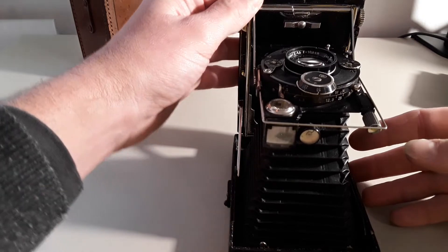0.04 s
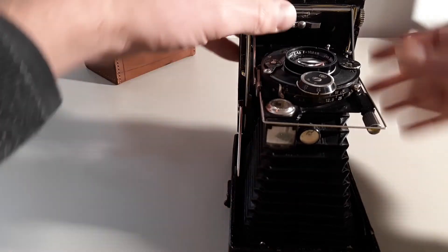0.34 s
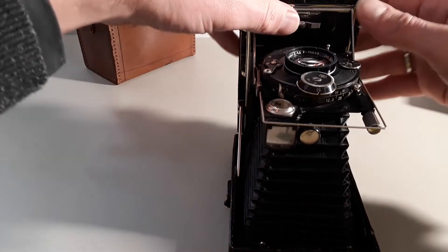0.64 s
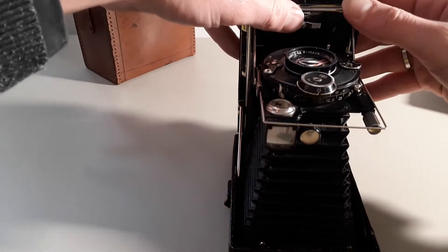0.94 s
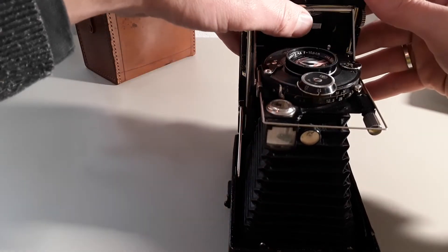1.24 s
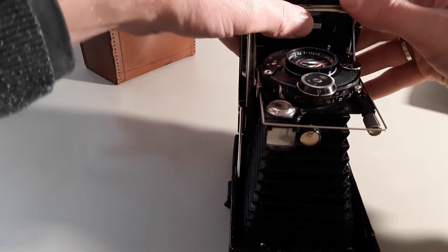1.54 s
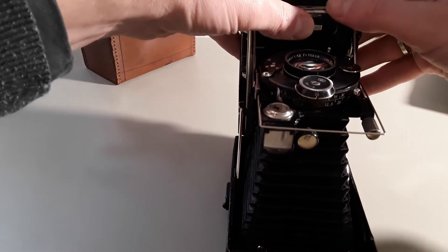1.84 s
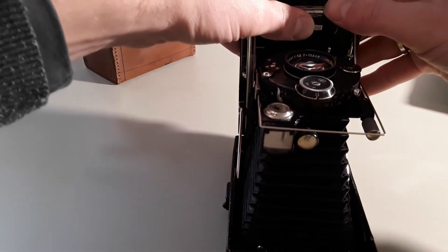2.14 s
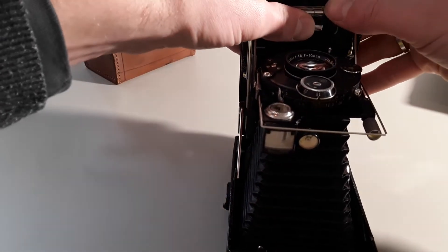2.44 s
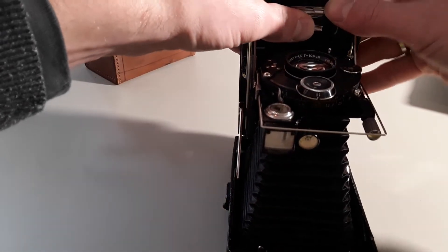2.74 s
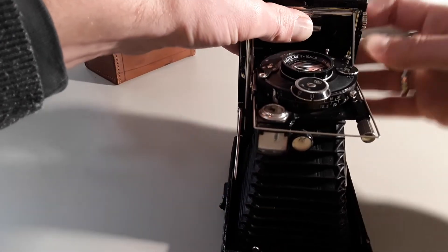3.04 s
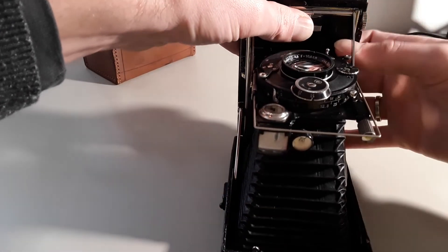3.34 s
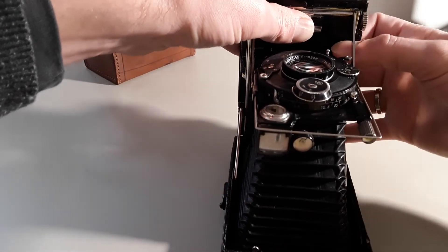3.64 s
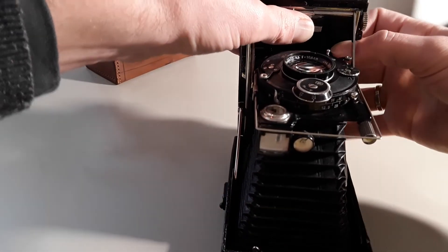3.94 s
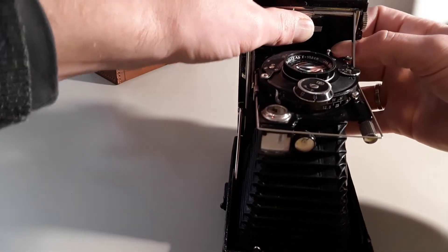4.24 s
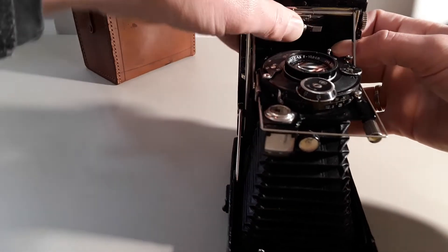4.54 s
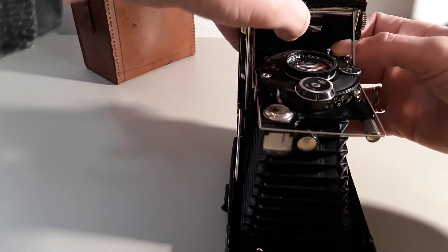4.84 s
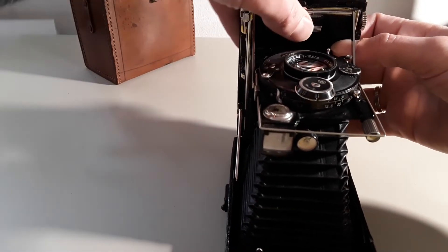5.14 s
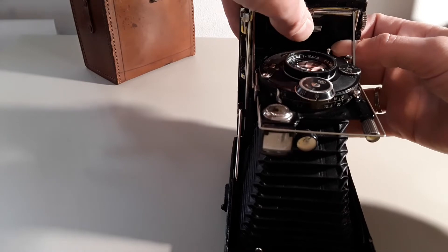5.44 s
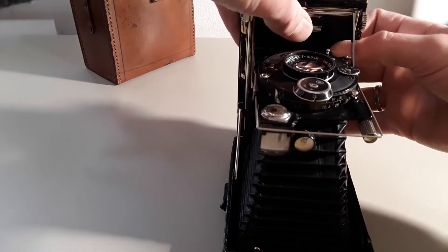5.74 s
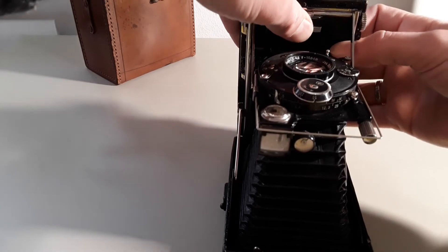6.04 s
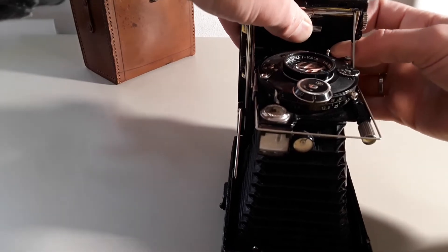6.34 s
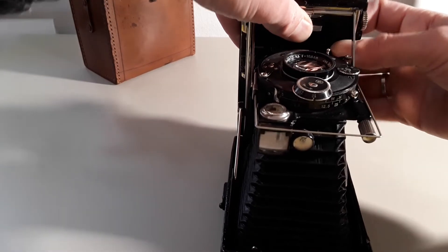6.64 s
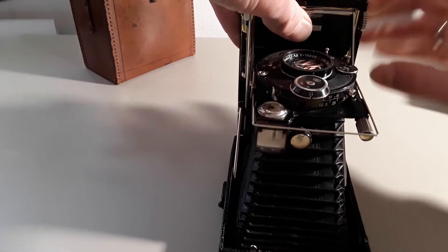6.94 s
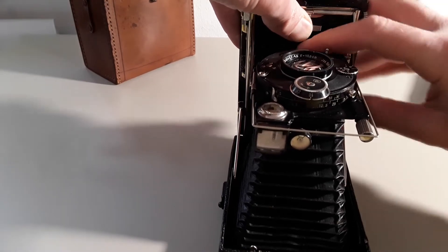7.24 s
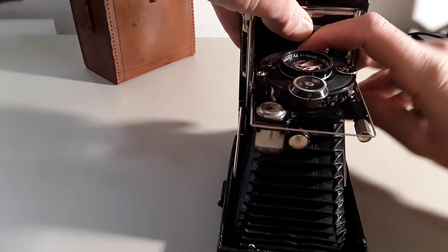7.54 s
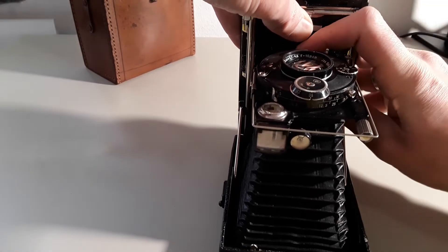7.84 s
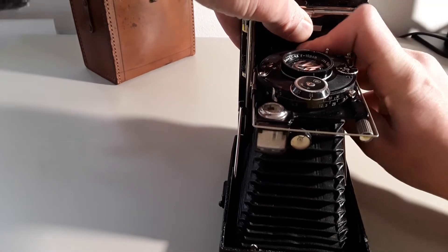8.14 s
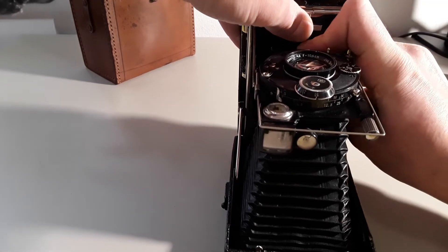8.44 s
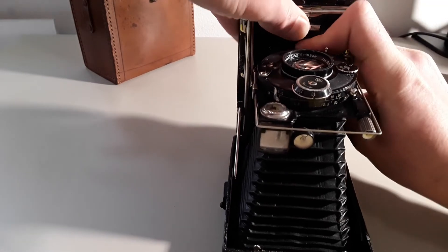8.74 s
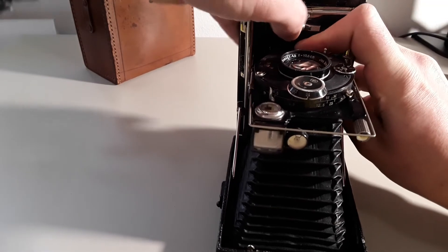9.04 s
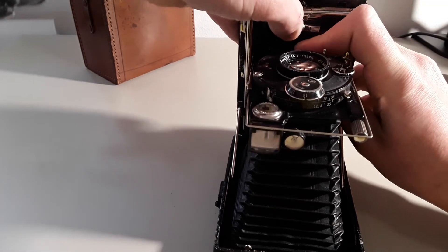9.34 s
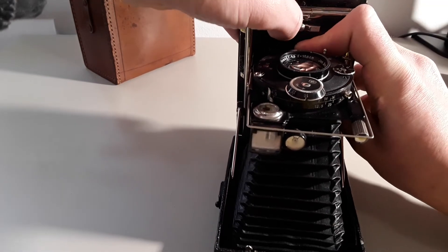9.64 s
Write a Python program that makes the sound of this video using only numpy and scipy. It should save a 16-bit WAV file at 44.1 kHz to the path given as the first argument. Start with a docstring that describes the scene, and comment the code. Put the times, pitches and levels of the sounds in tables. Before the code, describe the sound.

An old folding camera is handled on a table, heard close by in a quiet room with a faint low background noise. Fingers rub and shuffle softly over leather and metal throughout. From about 1 second, the hollow body gives light knocks, bunching around 2 seconds. Near 3 seconds a steel strut scrapes with a tiny squeak, followed by small ticks. More knocks and a sharp catch click come between 4 and 4.7 seconds, then a brief metal clink just after 5. Firmer knocks arrive around 6 seconds. From 6.7 to 7.5 seconds the handling is busiest, with bumps, short scrapes, snapping levers, faint squeaks and little steel rings. After a short lull, a knock at 8.3 seconds leads to a small squeak, a click and the loudest knock near 8.8. Another solid knock lands at about 9.6 seconds.

```python
"""Soft shuffling, hollow knocks, small ticks, scrapes and squeaks sound close by in a quiet room.
Two hands are working the struts (metal arms) of an old folding camera that stands on a table.
Fingers drag over its leather, and its hollow body knocks and rocks on the table top. Steel struts
stick and slip in their slides, catches and levers snap, and loose steel parts ring briefly."""
import sys
import numpy as np
from scipy import signal
from scipy.fft import rfft, irfft
from scipy.io import wavfile

SR = 44100
rng = np.random.default_rng(int(sys.argv[2]) if len(sys.argv) > 2 else 0)


def wav_record(signal):
    """Record a signal, one row per channel, as 16-bit PCM in the file named by sys.argv[1]."""
    frames = np.transpose(np.atleast_2d(signal))
    bounded = np.clip(frames, -1, 1)
    # unit amplitude maps onto the largest positive 16-bit level
    quanta = np.round(bounded * 32767).astype(np.int16)
    wavfile.write(sys.argv[1], SR, quanta)


N = 426888
TAPS = 8192  # samples in one short ring

# the tones at which the steel struts and lens board ring: (pitch [Hz], width [Hz], level [dB])
STEEL_TONES = [(1520, 890, 10.5), (1920, 370, -17), (2500, 390, 3), (3125, 340, 0), (3526, 260, -1.5),
               (4190, 310, -10), (5040, 480, -7), (6100, 680, -11.5), (7580, 1340, -1), (8460, 770, -8),
               (9170, 1200, -15.5), (13240, 1600, -17.5)]


def undb(db):
    """Turn decibels into a number to multiply by."""
    return 10 ** (np.asarray(db) / 20)


def unit(x):
    """Scale a sound to an average (rms) size of 1."""
    return x / np.sqrt(np.mean(x ** 2) + 1e-20)


def add(out, s, x):
    """Mix x into out, starting at s seconds."""
    i = max(int(s * SR), 0)
    out[i:i + len(x)] += x[:max(N - i, 0)]


def cut(x, hz, kind, order):
    """Keep the "low" part, the "high" part or one "band" of a sound."""
    return signal.sosfilt(signal.butter(order, np.clip(hz, 10, .45 * SR), kind, fs=SR, output="sos"), x)


def wobble(count, hz):
    """A random curve that wanders up and down, mostly slower than hz."""
    return unit(cut(rng.standard_normal(count), hz, "low", order=2))


def response(tones):
    """How an object rings after one tap: wider tones die sooner, and little sounds below the lowest."""
    t = np.arange(TAPS) / SR
    ring = sum(undb(db) * width * np.exp(-np.pi * width * t) * np.sin(2 * np.pi * hz * t)
               for hz, width, db in tones)
    return cut(ring, .75 * tones[0][0], "high", order=3)


def slips(count, per_s, spread_db):
    """Surfaces stick and slip, making tiny jolts of uneven size at random moments."""
    hit = rng.random(count) < per_s / SR
    direction = rng.choice([-1, 1], count)
    return hit * direction * undb(spread_db * np.minimum(rng.exponential(size=count), 4))


def contact(x, hard_db, hard_hz=800, db_per_octave=5, soft_hz=245, roll_off=1.67, width_hz=160):
    """The body bounces like a weight on a spring: a harder contact rings its higher tones."""
    hz = min(soft_hz + hard_hz * 2 ** (hard_db / db_per_octave), 560)
    bounce = signal.lfilter(*signal.iirpeak(hz, hz / width_hz, fs=SR), x)
    return cut(bounce, roll_off * hz, "low", order=3)


def steel(jolts, colour_db=3, dull_hz=11500, split_hz=6000):
    """Jolts shake one spot on the steel, giving a bright top and a lower ring. No two spots are alike."""
    spot = response([(hz, width, db + colour_db * rng.standard_normal()) for hz, width, db in STEEL_TONES])
    damped = cut(spot, dull_hz, "low", order=2)  # fingers muffle the highest tones
    sound = signal.fftconvolve(jolts, damped)
    return cut(sound, split_hz, "high", order=3), cut(sound, split_hz, "low", order=4)


def hands(s):
    """How strongly the hands press and slide at the times s, in dB."""
    # how hard the hands press: (time [s], level [dB])
    pressing = [(0.0, -75), (0.89, -64), (1.53, -67), (1.97, -50), (2.64, -73), (2.86, -54), (3.74, -72.5),
                (4.42, -50.5), (5.2, -66.5), (5.8, -61.5), (6.04, -53.5), (6.36, -64), (6.66, -52),
                (6.87, -49.5), (7.98, -62.5), (8.9, -52), (9.46, -64), (9.68, -73.5)]
    # how briskly the fingers slide: (time [s], level [dB])
    sliding = [(0.0, -90), (0.4, -82.5), (1.4, -89), (2.02, -81), (2.8, -96.5), (2.94, -77.5), (3.59, -92),
               (4.12, -94), (4.37, -75), (4.88, -89), (5.66, -87.5), (6.69, -79.5), (6.95, -73),
               (7.33, -72), (7.9, -87), (8.19, -85.5), (8.36, -76.5), (8.82, -72.5), (9.41, -88.5),
               (9.68, -94)]
    return [np.interp(s, *np.transpose(curve)) for curve in (pressing, sliding)]


def fidgets(per_s, scatter_db=4):
    """Small random touches of uneven strength: (time [s], pressing [dB], sliding [dB])."""
    when, size = rng.random((int(per_s * N / SR), 2)).T
    s = when * N / SR
    return zip(s, *(db + scatter_db * (2 * size - 1) for db in hands(s)))


def air(level_db=-68):
    """The quiet room makes a faint, steady noise."""
    # how that noise is spread from low to high: (pitch [Hz], relative level [dB])
    spectrum = [(25, -10.5), (60, -3), (100, 4), (300, -9.5), (500, -15), (1000, -23), (2500, -33),
                (6000, -39), (9000, -43.5), (15500, -39)]
    hz, db = np.transpose(spectrum)
    all_hz = np.arange(N // 2 + 1) * SR / N + 1
    shape = undb(np.interp(np.log(all_hz), np.log(hz), db))
    return undb(level_db) * unit(irfft(rfft(rng.standard_normal(N)) * shape, N))


def fingers(body, rumble_db=-6, hiss_db=-5, skin_hz=300, grab_hz=12, grab_db=3):
    """Skin grabs and drags on leather and metal: a dull, uneven rumble under a faint scratchy hiss."""
    press_db, slide_db = hands(np.arange(N) / SR) + grab_db * wobble(N, grab_hz)
    on_leather = signal.fftconvolve(slips(N, per_s=450, spread_db=2), body)[:N]
    on_steel = signal.fftconvolve(slips(N, per_s=3000, spread_db=3), response(STEEL_TONES))[:N]
    rumble = unit(cut(on_leather, skin_hz, "low", order=3))
    hiss = unit(cut(on_steel, 2500, "high", order=1))
    return rumble * undb(press_db + rumble_db) + hiss * undb(slide_db + hiss_db)


def nudges(body, above_press_db=9.5):
    """The fingers bump the body softly, louder as they press harder."""
    out, bump = np.zeros(N), contact(body, hard_db=-28.5)
    for s, press_db, _ in fidgets(per_s=8):
        add(out, s, undb(press_db + above_press_db) * bump / np.abs(bump).max())
    return out


def tick(top_db, low_db, chatter_s=0.0021):
    """A small steel part lets go and chatters for a few thousandths of a second."""
    t = np.arange(512) / SR
    chatter = rng.standard_normal(len(t)) * np.exp(-t / chatter_s)
    top, low = steel(chatter)
    return undb(top_db) * top / np.abs(top).max() + undb(low_db) * low / np.abs(low).max()


def rattles(above_slide_db=4.5):
    """Loose parts tick faintly as the fingers slide over them."""
    out = np.zeros(N)
    for s, _, slide_db in fidgets(per_s=6.5):
        add(out, s, tick(slide_db + above_slide_db, slide_db + above_slide_db))
    return out


def knocks(body, gain_db=-0.5, hard_bias_db=12, give_s=0.0018, rock_s=.0112, rebound=0.23,
           shudder_db=-24, shudder_s=0.011):
    """A knock rings the body once the leather gives way; it shudders, then rocks back more weakly."""
    # the body hits the table: (time [s], level [dB], clack of the higher tones [dB])
    blows = [(0.891, -37.5, -74), (1.279, -53.5, -86.5), (1.55, -41, -77), (1.7, -45, -80),
             (1.891, -35, -62), (2.031, -35.5, -66.5), (2.105, -36.5, -64.5), (2.185, -39, -68),
             (2.317, -46.5, -86), (2.659, -46, -85), (2.754, -35.5, -73), (2.894, -33, -51),
             (3.926, -50.5, -93), (4.116, -31.5, -69), (4.239, -35, -61.5), (4.352, -27.5, -49),
             (4.479, -36.5, -59), (4.604, -36, -65.5), (4.704, -41.5, -69.5), (5.561, -42.5, -70.5),
             (5.741, -45, -70), (5.816, -36.5, -73), (5.889, -30, -63.5), (5.905, -35, -63.5),
             (6.051, -24, -52), (6.132, -27, -55.5), (6.253, -36.5, -64.5), (6.683, -27, -47.5),
             (6.778, -33, -44), (6.84, -34, -58), (6.895, -27, -46.5), (7.093, -32, -52),
             (7.232, -38.5, -60.5), (7.386, -37.5, -53), (8.28, -25.5, -47), (8.77, -18.5, -38),
             (8.839, -37, -51), (8.92, -23.5, -42.5), (9.022, -37, -58), (9.137, -40.5, -63),
             (9.637, -20.5, -40.5)]
    out, t = np.zeros(N), np.arange(TAPS) / SR
    for s, db, clack_db in blows:
        blow = contact(body, clack_db - db + hard_bias_db, width_hz=137, roll_off=1.55)
        blow *= undb(db + gain_db) / np.abs(blow).max()
        shudder = slips(TAPS, per_s=910, spread_db=5) * np.exp(-t / shudder_s)
        add(out, s + give_s, blow + undb(shudder_db) * signal.fftconvolve(blow, shudder)[:TAPS])
        add(out, s + give_s + rock_s * rng.uniform(.96, 1.04), rebound * blow)
    return out


def scrapes(body, hiss_db=-7, ring_db=-1, slip_hz=9600, catch_hz=120, catch_db=3,
            hiss_from_db=-76.5, hiss_growth=0.18):
    """Tiny jolts shake body and steel: short strut scrapes, a lever's chattering clack and a dull thud."""
    # bursts of jolts: (middle time [s], length [s], body shake [dB], hardness [dB], steel rasp [dB])
    bursts = [(1.754, 0.062, -52, -11.5, -79), (2.802, .07, -48.5, -13.5, -71.5),
              (2.907, 0.072, -42, -12.5, -68.5), (2.983, 0.11, -58, -10.5, -68.5),
              (3.273, .17, -58, -13.5, -75), (4.49, .042, -48, -9, -74), (4.584, 0.065, -58, -9.5, -79.5),
              (4.841, 0.046, -52, -10, -89), (5.524, 0.1, -64, -9.5, -93), (6.814, .08, -49, -14.5, -72),
              (6.975, .016, -43.5, -6, -53.5), (6.992, 0.051, -40.5, -20, -75),
              (7.145, 0.06, -56.5, -8.5, -70), (7.22, 0.077, -64.5, -3, -74),
              (7.36, 0.03, -37.5, -14.5, -64), (7.402, 0.058, -43, -11.5, -63),
              (7.512, .06, -56.5, -3, -71.5), (7.656, 0.037, -51, -9, -81), (8.355, 0.099, -52.5, -10, -80),
              (8.691, 0.057, -52, -13, -69.5), (8.76, 0.076, -49, -13.5, -70),
              (9.215, 0.046, -49.5, -13, -82), (9.364, 0.044, -59, -10.5, -80.5)]
    out = np.zeros(N)
    for s, length, shake_db, hard_db, rasp_db in bursts:
        count = int(length * SR)
        catching = np.resize(wobble(TAPS, catch_hz), count)
        swell = np.sin(np.linspace(0, np.pi, count)) * undb(catch_db * catching)
        jolts = swell * np.resize(slips(TAPS, per_s=2500, spread_db=2), count)
        shake = contact(signal.fftconvolve(jolts, body), hard_db)
        top, low = steel(cut(jolts, slip_hz, "low", order=6))
        top_db = rasp_db + hiss_growth * (rasp_db - hiss_from_db)  # more force sounds brighter
        for part, db in ((shake, shake_db), (top, top_db + hiss_db), (low, rasp_db + ring_db)):
            add(out, s - length / 2, undb(db) * unit(part) * np.sqrt(count / 2 / len(part)))
    return out


def catches(snap_db=-10, ring_db=13):
    """Catches and levers tick as the hands work them."""
    # each catch or lever letting go: (time [s], relative snap [dB], relative low ring [dB])
    releases = [(1.7596, -56, -86), (2.7804, -51, -76), (2.8175, -45, -78), (3.2134, -49, -65),
                (3.2427, -41.5, -65), (4.124, -53, -79), (4.1764, -44, -72), (4.2413, -50, -75),
                (4.2955, -33, -58), (4.7407, -59, -70.5), (5.1097, -40, -75), (5.8913, -54.5, -79),
                (6.0547, -46, -64), (6.2115, -47.5, -72), (6.4497, -86, -70), (6.5275, -71, -64),
                (6.5747, -45, -75), (7.197, -35, -65), (7.2338, -44, -66), (7.3584, -44, -58),
                (7.4133, -35, -72), (8.6205, -47, -75), (8.7283, -33, -64.5), (8.961, -50, -75)]
    out = np.zeros(N)
    for s, top_db, low_db in releases:
        add(out, s, tick(top_db + snap_db, low_db + ring_db))
    return out


def squeaks(waver=0.025):
    """A dry strut or a fingertip slips and gives a short, wavering squeak."""
    # each squeak: (time [s], length [s], start pitch [Hz], end pitch [Hz], level [dB])
    whistles = [(2.935, 0.044, 4870, 4340, -66), (2.984, .02, 8360, 7800, -61.5),
                (7.103, 0.086, 3260, 3184, -67.5), (7.171, 0.04, 1897, 1830, -65),
                (8.67, 0.042, 930, 1020, -55)]
    out = np.zeros(N)
    for s, length, start_hz, end_hz, db in whistles:
        count = int(length * SR)
        hz = np.linspace(start_hz, end_hz, count) * (1 + waver * wobble(count, hz=500))
        swell = np.sin(np.linspace(0, np.pi, count))
        add(out, s, undb(db) * swell * np.sin(2 * np.pi * np.cumsum(hz) / SR))
    return out


def clinks():
    """Loose steel parts ring freely with pure tones that die away."""
    # each ringing tone: (time [s], pitch [Hz], time to fade by 60 dB [s], level [dB])
    rings = [(3.245, 6500, 0.019, -57), (5.109, 4400, 0.029, -51.5), (5.109, 3600, 0.0076, -44.5),
             (5.109, 5100, 0.011, -54), (5.108, 7310, 0.012, -50), (5.109, 1700, 0.059, -64.5),
             (6.973, 3410, 0.024, -44), (7.505, 1584, 0.1, -56), (9.64, 2520, 0.0068, -45)]
    out, t = np.zeros(N), np.arange(TAPS) / SR
    for s, hz, fade_s, db in rings:
        add(out, s, undb(db) * np.sin(2 * np.pi * hz * t) * np.exp(-np.log(1000) * t / fade_s))
    return out


def room(x, first_wall_s=0.0025):
    """The echo builds up after the first wall, and each band of pitches fades at its own speed."""
    # the room's echo: (pitch [Hz], time to fade by 60 dB [s], level against the direct sound [dB])
    echo = [(94, 0.89, -18.5), (288, 0.44, -6), (630, 0.66, -7.5), (1970, 0.74, -3), (4860, 0.51, -7),
            (10300, 0.36, -8)]
    hz, fades, levels = np.transpose(echo)
    t, tail = np.arange(SR) / SR, 0
    for low in 50 * 2 ** np.arange(0, 8.5, .5):
        high = low * np.sqrt(2)
        log_middle = np.log(low * high) / 2
        fade_s, echo_db = (np.interp(log_middle, np.log(hz), column) for column in (fades, levels))
        band = cut(rng.standard_normal(SR), [low, high], "band", order=3)
        band *= np.exp(-np.log(1000) * t / fade_s)
        band *= np.clip(t / first_wall_s - .5, 0, 1)
        tail = tail + unit(band) * undb(echo_db) * np.sqrt(2 * (high - low)) / SR
    return signal.fftconvolve(x, tail)[:N]


def scene():
    """All the sounds of handling the camera, with the room's echo and steady noise."""
    # the tones of the hollow body on the table top: (pitch [Hz], width [Hz], level [dB])
    body_tones = [(98.8, 5.7, 16.5), (143.7, 22, 11.5), (214.2, 28, 6), (285.7, 46, 3), (302.5, 66, -3),
                  (443.4, 43, -9.5), (546, 39, -7.5), (641, 49, -4.5), (778, 19, -9.5), (984, 15.7, 2.5),
                  (1130, 200, -3), (1663, 330, 4.5), (1990, 193, 3.5)]
    body = response(body_tones)
    direct = knocks(body) + catches() + clinks() + scrapes(body) + squeaks()
    direct += fingers(body) + nudges(body) + rattles()
    return (direct + room(direct) + air())[None]


def record(dry, port_hz=8360, port_width_hz=450, port_db=11, top_hz=15750):
    """The microphone's small opening (its port) rings at a high pitch; the very top is cut off."""
    port = signal.lfilter(*signal.iirpeak(port_hz, port_hz / port_width_hz, fs=SR), dry)
    top_cut = signal.ellip(8, .2, 70, top_hz, fs=SR, output="sos")
    return signal.sosfilt(top_cut, dry + undb(port_db) * port)


dry = scene()
out = record(dry)
wav_record(out)
```